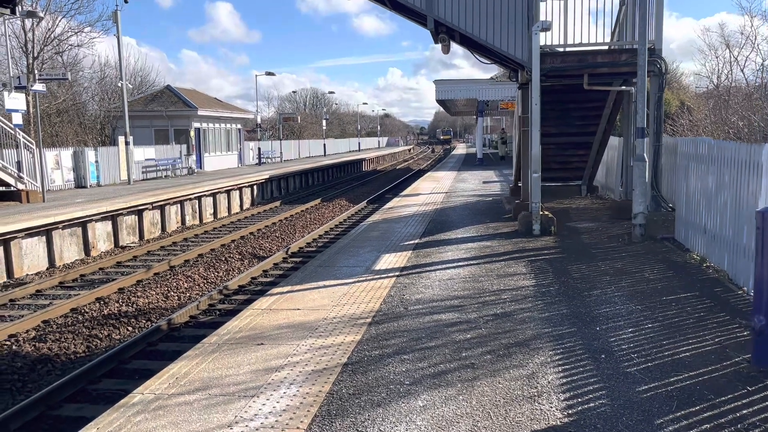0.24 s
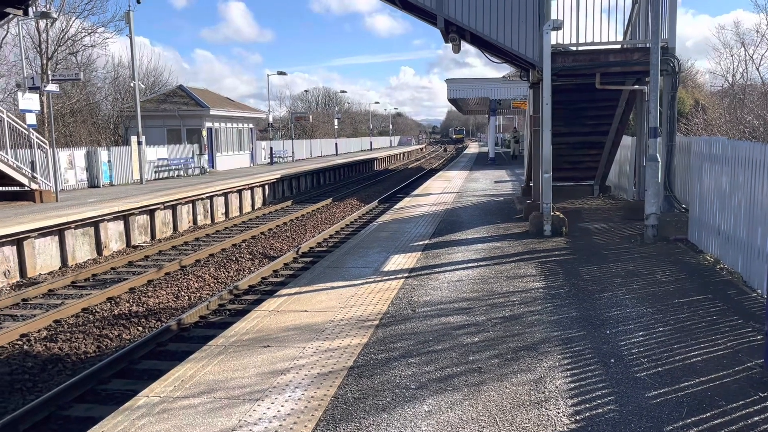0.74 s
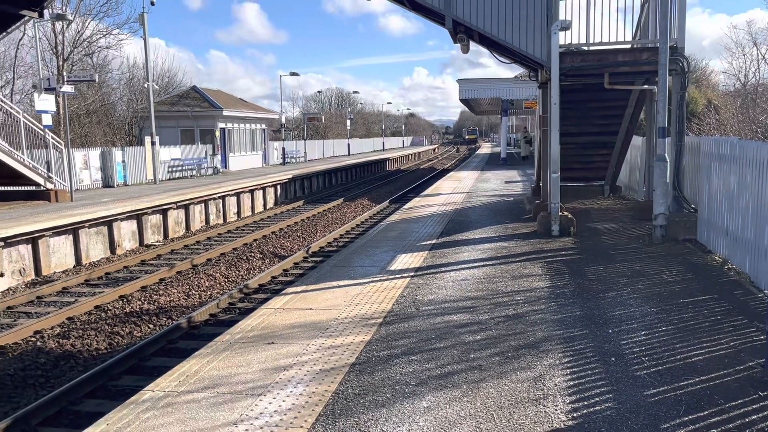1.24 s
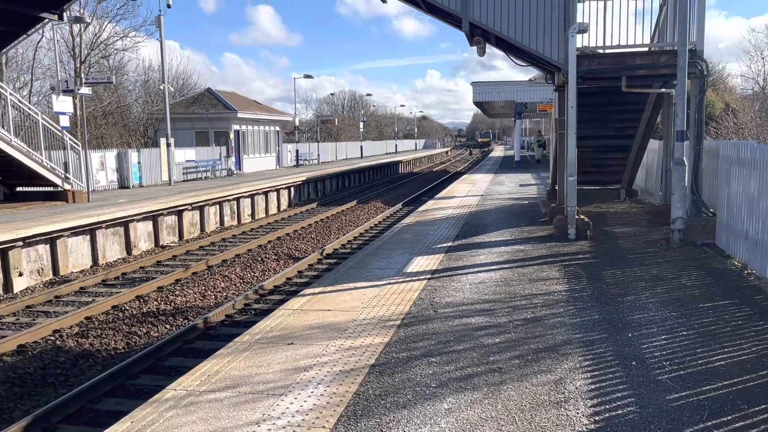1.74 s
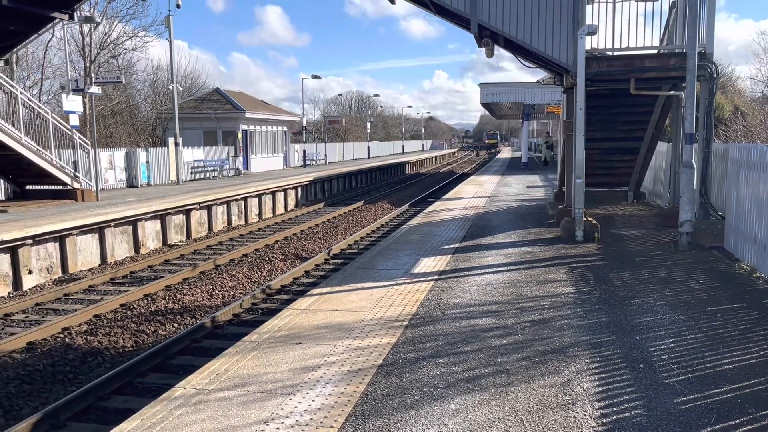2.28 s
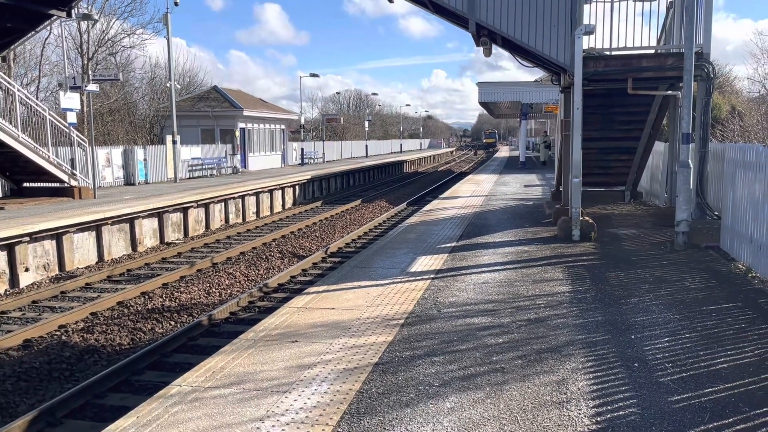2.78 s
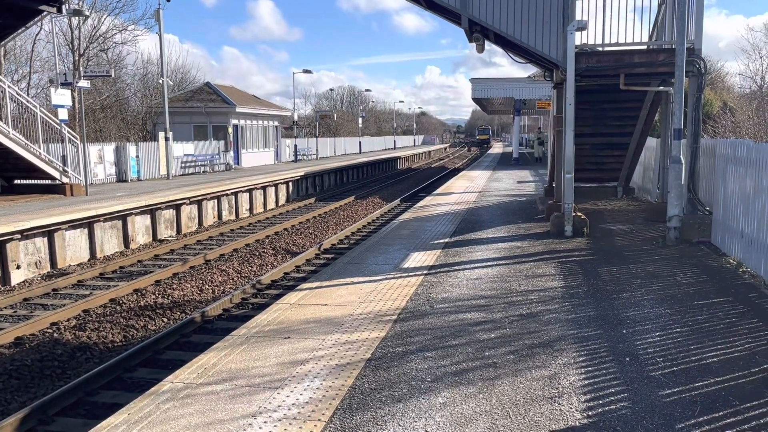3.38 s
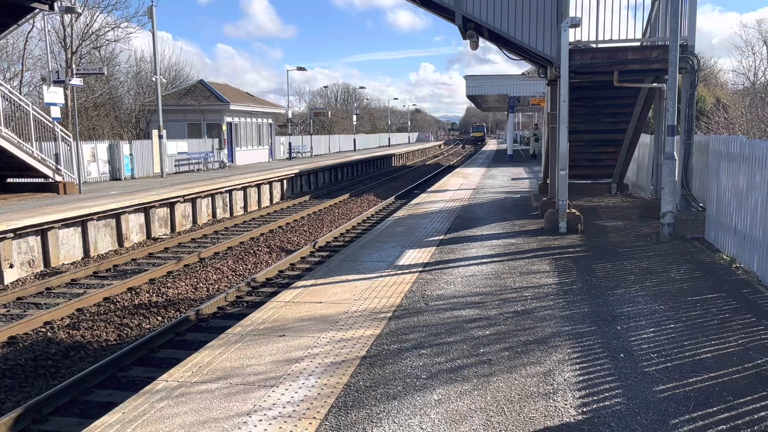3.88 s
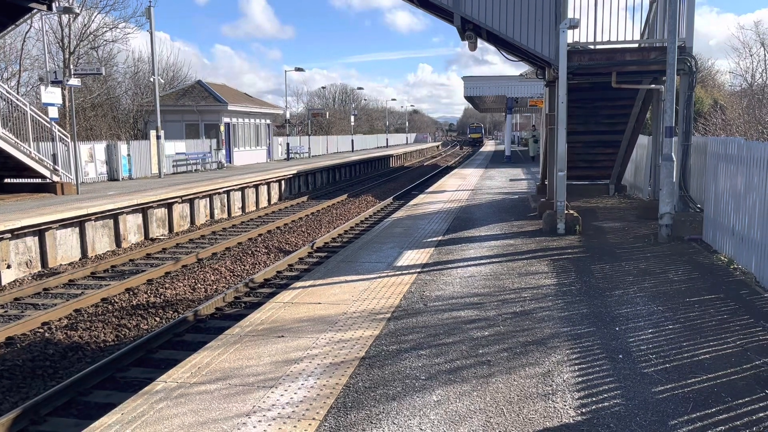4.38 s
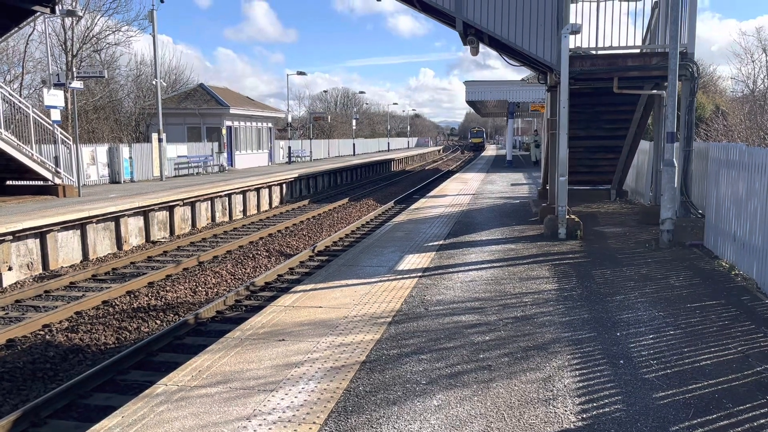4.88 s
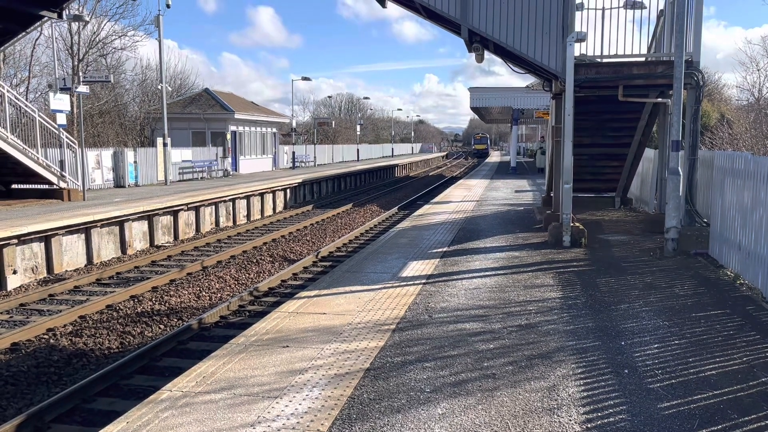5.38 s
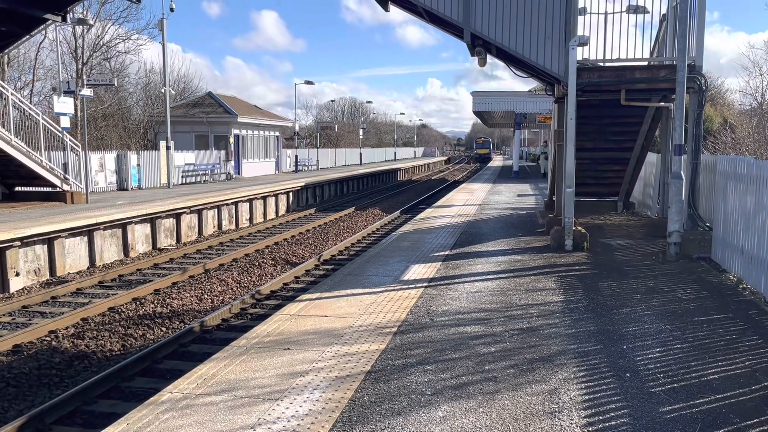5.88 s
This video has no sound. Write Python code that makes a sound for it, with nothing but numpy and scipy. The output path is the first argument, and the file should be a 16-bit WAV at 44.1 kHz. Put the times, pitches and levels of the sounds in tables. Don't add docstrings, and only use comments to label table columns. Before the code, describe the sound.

Deep fluttering wind rumble dominates, surging at about two and four seconds. Behind it a far train's broad, muffled roar and steady low hum swell very gradually without arriving. Thin high bird calls and softer sliding whistles appear throughout from nearby trees. Handling ticks cluster near one and a half and four point three seconds. Open outdoor stereo pickup, handheld.

```python
import sys
import numpy as np
from scipy import signal
from scipy.fft import rfft, irfft, next_fast_len
from scipy.io import wavfile

SR = 44100
rng = np.random.default_rng(int(sys.argv[2]) if len(sys.argv) > 2 else 0)


def convert_level_to_amplitude(level_db):
    exponent = np.asarray(level_db, float) / 20
    return 10 ** exponent


def bounce(signal):
    frames = np.transpose(np.atleast_2d(signal))
    limited = np.clip(frames, -1, 1)
    pcm = np.round(limited * 32767).astype(np.int16)
    wavfile.write(sys.argv[1], SR, pcm)


N = 270333


def rms_one(x):
    return x / np.sqrt(np.mean(x ** 2) + 1e-20)


def at_hz(points, hz, axis=1):
    points = np.array(points)
    return np.interp(np.log(hz), np.log(points[:, 0]), points[:, axis])


def drift(rate_hz):
    pole = np.exp(-2 * np.pi * rate_hz / SR)
    wander = signal.lfilter([1], [1, -2 * pole, pole * pole], rng.standard_normal(N + SR))
    return rms_one(wander[SR:])


# frequency in Hz, likeness of the two sides from 0 to 1, phase lead of
# the left in radians, left over right level in dB.
SIDES = [(60, .98, 0, 0), (320, .84, -.6, .6), (470, .2, -1.3, 1.8), (620, .45, -2.4, -1.4),
         (850, .5, -3.3, -1.2), (1150, .35, -3, -3), (1300, .25, -2, -7), (1600, .5, -1.4, -5.5),
         (1720, .6, .6, 3.8), (2200, .65, .8, 0), (3800, .52, 1.3, 3), (5300, .4, 2.6, 1.5),
         (8000, .7, 3.14, -2), (10500, .9, 6.28, 0)]


def field(spectrum):
    size = next_fast_len(N)
    hz = np.maximum(np.arange(size // 2 + 1) * SR / size, 1)
    shared, left, right = rfft(rng.standard_normal((3, size)))
    alike = at_hz(SIDES, hz)
    common, own = np.sqrt(alike), np.sqrt(1 - alike)
    half = convert_level_to_amplitude(at_hz(SIDES, hz, axis=3) / 2) * np.exp(.5j * at_hz(SIDES, hz, axis=2))
    ports = np.array([half * common * shared + abs(half) * own * left,
                      common * shared / half + own * right / abs(half)])
    inside = (hz > spectrum[0][0]) & (hz < spectrum[-1][0])
    out = irfft(ports * convert_level_to_amplitude(at_hz(spectrum, hz)) * inside, size)[:, :N]
    return out / np.std(out.mean(axis=0))


def pan(x, side_db, lag=0):
    return np.array([np.roll(x, lag) * convert_level_to_amplitude(side_db / 2), x * convert_level_to_amplitude(-side_db / 2)])


def echoes(x, t60, wet_db):
    t = np.arange(SR // 2) / SR
    tail = rng.standard_normal((2, len(t))) * convert_level_to_amplitude(-60 * t / t60) * (t > .004)
    response = rms_one(tail) / np.sqrt(len(t))
    return convert_level_to_amplitude(wet_db) * signal.fftconvolve(x[None], response, axes=1)[:, :N]


# start in seconds, level in dB.
GUSTS = [
    (-.05, -43.5),
    (2.1, -38.5),
    (3.8, -36.5),
]


def gust_db():
    t = np.arange(N) / SR
    rise_s, sag_db_per_s = 0.048, 3
    levels = []
    for s, db in GUSTS:
        before_full = np.clip((s + rise_s - t) / rise_s, 0, 1)
        levels.append(db - sag_db_per_s * (t - s) - 40 * before_full)
    return np.max(levels, axis=0)


# time in seconds, peak in dB, frequency in Hz, width in seconds.
SURGES = [(0.035, -34, 66, 0.022), (0.48, -34.5, 65, 0.032), (0.668, -29, 74, 0.016),
          (0.728, -39.5, 65.1, 0.02), (0.931, -37.5, 73, 0.04), (1.059, -33, 67.5, 0.027),
          (1.209, -38.5, 72.5, 0.086), (1.448, -34.5, 69.0, 0.04), (1.694, -35, 75.4, 0.037),
          (1.952, -33.5, 70.7, 0.028), (2.192, -24.5, 71.2, 0.036), (2.309, -33, 64.7, 0.018),
          (2.5, -28, 79.6, 0.023), (2.783, -33, 71.4, 0.02), (3.107, -29, 64.6, 0.024),
          (3.402, -32, 66.0, 0.027), (3.529, -34.5, 75.4, 0.014), (3.93, -25.5, 68, 0.053),
          (3.997, -26.5, 68.6, 0.012), (4.049, -25, 65.9, 0.011), (4.213, -28.5, 67.6, 0.033),
          (4.34, -32.5, 78, 0.014), (4.755, -34.5, 75.3, 0.03), (4.875, -32.5, 70.5, 0.017),
          (5.025, -32.5, 65.8, 0.018), (5.112, -35.5, 80, 0.062), (5.457, -32, 75, 0.039),
          (5.635, -39, 59.0, 0.019), (5.76, -31.5, 71.9, 0.028), (6.059, -36.5, 62.3, 0.018)]


def ripples():
    gap_s = .11
    s = np.arange(.1, N / SR, gap_s)
    chance = rng.standard_normal((200, 4))[:len(s)]
    s = np.clip(s + .2 * gap_s * chance[:, 0], 0, N / SR)
    peak_db = -41.5 + 1.5 * chance[:, 1]
    hz = 74.4 + 4.4 * chance[:, 2]
    width_s = .021 * np.exp(0.2 * chance[:, 3])
    rows = np.transpose([s, peak_db, hz, width_s])
    return [tuple(row) for row in rows
            if min(abs(row[0] - at) - width for at, _, _, width in SURGES) > .025]


# frequency in Hz, density in dB per Hz.
RUMBLE_COLOUR = [(12, -46.5), (20, -15.5), (46, -4.5), (65, -3.5), (83, -2.5), (114, -15), (170, -17.5),
                 (220, -50), (370, -120)]


def rumble():
    stretch, bed_db, apart_db, buffet_db = 1.27, -2.0, -19, -13
    t = np.arange(-8000, 8000) / SR
    heave = np.zeros((3, N + SR))
    phases = rng.uniform(0, 2 * np.pi, (200, 2))
    for (s, db, hz, width), phase in zip([*SURGES, *ripples()], phases):
        swell = convert_level_to_amplitude(db - 1.57) * np.exp(-2 * np.log(2) * (t / (stretch * width)) ** 2)
        at = int(s * SR)
        heave[:2, at:at + len(t)] += swell * np.sin(2 * np.pi * hz * t + phase[:, None])
        heave[2, at:at + len(t)] += swell
    both, apart, gust = heave[:, 8000:N + 8000]
    bed = convert_level_to_amplitude(gust_db() + bed_db) + convert_level_to_amplitude(buffet_db) * gust
    return both + convert_level_to_amplitude(apart_db) * apart * [[1], [-1]] + bed * field(RUMBLE_COLOUR)


def sung(shape, notes):
    return [[(s + share * length, hz + bend_hz, db + under_db) for share, bend_hz, under_db in shape]
            for s, length, hz, db in notes]


def whistle(notes, flutter_db, waver, octave_db=-45):
    out, t = np.zeros(N), np.arange(N) / SR
    flutter = convert_level_to_amplitude(flutter_db * drift(37))
    shake = 1 + waver * drift(65)
    for rows in notes:
        span = slice(int(rows[0][0] * SR), int(rows[-1][0] * SR))
        s, row_hz, row_db = np.transpose(rows)
        hz = np.interp(t[span], s, row_hz)
        level_db = np.interp(t[span], s, row_db)
        turn = 2 * np.pi * np.cumsum(hz * shake[span]) / SR
        tone = np.sin(turn) + convert_level_to_amplitude(octave_db) * np.sin(2 * turn)
        ends = signal.windows.tukey(len(hz), .15)
        out[span] += np.sqrt(2) * convert_level_to_amplitude(level_db) * ends * flutter[span] * tone
    return out


# start in seconds, length in seconds, pitch in Hz, level in dB.
RISING = [
    (0.288, .24, 3815, -75.5),
    (1.782, 0.23, 4040, -71.5),
    (3.765, .29, 3966, -72.5),
    (5.421, .27, 4010, -71.5),
]
LOW_NOTES = [
    (0.769, 0.081, 2920, -77.5),
    (2.08, .125, 2960, -73),
    (4.06, .14, 2900, -73),
    (5.72, .2, 2870, -81),
]
# share of the length, offset from the pitch in Hz, offset from the level in dB.
RISE_SHAPE = [(0, -450, -9), (.12, -200, -3), (.4, 0, 0), (.7, 120, -3), (1, 200, -8)]
LOW_SHAPE = [(0, -190, -6), (.65, 0, 0), (1, 50, -9)]
# start in seconds, length in seconds, start pitch in Hz,
# end pitch in Hz, level in dB.
SHORT_NOTES = [(0.581, 0.073, 4980, 4750, -74.5), (.655, .055, 4200, 3920, -79),
               (2.9, 0.053, 4950, 4870, -74), (3.012, .03, 4850, 4780, -73), (4.189, .07, 4450, 4350, -73),
               (4.72, .13, 4880, 4590, -77.5), (5.094, 0.089, 5140, 5000, -81),
               (5.716, 0.1, 4560, 4390, -75.5)]


def far_song():
    short = []
    for s, length, start_hz, end_hz, db in SHORT_NOTES:
        short.append([(s, start_hz - 180, db - 7), (s + .3 * length, start_hz, db),
                      (s + length, end_hz, db - 7)])
    return whistle(sung(RISE_SHAPE, RISING) + sung(LOW_SHAPE, LOW_NOTES) + short, 5.0, waver=.011)


# start in seconds, length in seconds, lower voice in Hz,
# lower voice level in dB, upper voice level in dB.
CALLS_TWO = [
    (.915, 0.14, 5730, -62.5, -63.5),
    (1.862, 0.14, 5710, -65.5, -74.5),
    (3.134, .16, 5770, -66, -69.5),
    (3.385, .17, 5800, -68.5, -70),
    (5.263, .145, 5750, -61.5, -71),
]
# share of the length, offset from the pitch in Hz,
# offset from the level in dB.
LOWER_SHAPE = [(0, 150, -3), (.12, 40, 0), (.6, 0, 0), (.75, -130, -3), (1, -290, -6)]
UPPER_SHAPE = [(0, -170, -2), (.3, 20, 0), (.6, 40, -2), (1, -60, -9)]


def near_call():
    below = [call[:4] for call in CALLS_TWO]
    above = [(s + .008, .85 * length, 6050, db) for s, length, _, _, db in CALLS_TWO]
    lower = whistle(sung(LOWER_SHAPE, below), 3.0, waver=.006, octave_db=-40)
    upper = whistle(sung(UPPER_SHAPE, above), 4.5, waver=.009, octave_db=-29)
    return lower + upper


# time in seconds, peak in dB.
CHIPS = [
    (2.122, -75),
    (2.307, -77),
    (4.859, -76),
    (4.97, -75),
    (5.063, -77),
]


def chips():
    start_hz, top_hz, length_s = 5800, 7500, .009
    u = np.arange(int(length_s * SR)) / (length_s * SR)
    hz = start_hz + (top_hz - start_hz) * u ** 0.7
    glide = np.sin(2 * np.pi * np.cumsum(hz) / SR) * np.sin(np.pi * u) ** 0.31
    at = np.zeros(N)
    for s, db in CHIPS:
        at[int(s * SR)] = convert_level_to_amplitude(db + 3.5)
    return signal.fftconvolve(at, glide)[:N]


def birds():
    far, near, quick = far_song(), near_call(), chips()
    return (pan(far, 2.5, lag=-2) + echoes(far, 0.3, -1.5)
            + pan(near, -2.5, lag=3) + echoes(near, 0.42, -7)
            + pan(quick, 1.2) + echoes(quick, 0.23, 0.5))


# time in seconds, peak in dB,
# frequency in Hz, left over right level in dB.
TICKS = [(0.858, -64, 5090, -8), (0.9632, -57, 5640, -7), (1.1667, -68, 4900, 3), (1.3222, -58, 5540, -8),
         (1.469, -66.5, 5300, -1), (1.472, -57.5, 5800, -12), (1.4848, -59, 4870, -2),
         (1.4883, -48.5, 4370, 18), (1.4993, -49, 3780, 0), (1.5764, -52.5, 3370, 1),
         (1.6218, -62, 3300, 3), (1.6753, -60.5, 4700, 5), (2.2413, -62, 4240, 5), (2.25, -57, 4186, 7),
         (4.2738, -65, 6640, 8), (4.2789, -50, 5100, -7), (4.2818, -54, 4670, 21), (4.285, -44.5, 4030, -1),
         (4.3093, -56, 4430, 0), (4.341, -51, 3330, 5), (4.3505, -50.5, 3440, -1), (4.3985, -59, 4310, -1),
         (4.407, -48, 4000, 4), (4.439, -55.5, 3580, -1.5), (4.4612, -59.5, 5000, -6),
         (5.2408, -66, 5300, 4), (5.9383, -53.5, 3480, -6), (5.996, -54, 3680, 9), (6.077, -54.5, 3560, 8)]
SNAPS = [(.867, -72, 10700, -9), (.963, -65, 12100, -2), (1.471, -66.5, 12300, -2.5),
         (1.4727, -52.5, 10500, -5), (1.4855, -69.5, 12560, -7), (1.499, -62, 10460, 3),
         (1.5346, -71, 9760, -5), (4.2735, -53, 9470, 7), (4.278, -58.5, 9800, -4),
         (4.3412, -74, 10100, 10), (5.242, -78, 11100, -6)]
# time in seconds, peak in dB,
# left over right level in dB.
KNOCKS = [(1.8427, -60, 0), (3.1291, -53, 5), (3.2223, -48.5, 0), (3.4482, -45.5, 5), (3.4507, -45.5, -3),
          (4.347, -52, -2), (4.3852, -55, 0), (5.748, -66, -3), (5.94, -52, -5)]
PRICKS = [(.6543, -71, 3), (1.4172, -74, -6), (1.501, -62, 2), (2.0456, -79, 7), (2.278, -76, -3),
          (3.1285, -77, -8), (4.408, -67, 3), (5.5724, -68, -9.5)]


def contacts():
    chance = rng.standard_normal(40)
    knocks = [(s, db, 1960 + 110 * c, side_db) for (s, db, side_db), c in zip(KNOCKS, chance)]
    pricks = [(s, db, 6800, side_db) for s, db, side_db in PRICKS]
    return [*TICKS, *SNAPS, *knocks, *pricks]


def ticks():
    cycles, sag, rise_cycles = 12, 0.18, 0.99
    out, t = np.zeros((2, N + SR)), np.arange(900) / SR
    for s, db, hz, side_db in contacts():
        turns = t * hz
        sagging_hz = hz * (1 - sag / 3 + sag * np.exp(-turns / 2.0))
        turn = 2 * np.pi * np.cumsum(sagging_hz) / SR
        swell = convert_level_to_amplitude(-60 * turns / cycles) * (1 - np.exp(-turns / rise_cycles)) ** 2
        tick = convert_level_to_amplitude(db + 2.0) * swell / swell.max() * np.sin(turn)
        at = int((s - 1.6 / hz) * SR)
        out[:, at:at + len(t)] += pan(tick, side_db, lag=-1)
    out = out[:, :N]
    return out + echoes(out.mean(axis=0), 0.033, -3.5)


def hum():
    turn = 2 * np.pi * np.cumsum(291 + 0.54 * drift(2.43)) / SR
    order = np.sin(turn) * convert_level_to_amplitude(3.1 * drift(3))
    octave = convert_level_to_amplitude(-16) * np.sin(2 * turn) * convert_level_to_amplitude(2.6 * drift(2.3))
    return pan(np.sqrt(2) * convert_level_to_amplitude(-54.5) * (order + octave), 0.3, lag=16)


# frequency in Hz, density in dB per Hz.
BODY = [(53, -27.5), (90, -4.5), (113, -6.5), (231, -8), (296, -9), (326, -6), (356, -16), (450, -16.5),
        (580, -49), (990, -120)]
ROLLING = [(210, -30.5), (350, -2), (455, -4), (495, 0), (543, -5.5), (587, -1.5), (920, -4), (1200, -8),
           (1520, -10), (1620, -13), (1680, -23.5), (1900, -46.5)]
HISS = [(1400, -33), (1650, -6.5), (1750, -1.5), (2150, -3), (2520, -7), (3700, -13.5), (4200, -13.5),
        (4900, -13.5), (5800, -19), (6800, -27), (7800, -31), (9000, -64)]
AIR = [(4120, -29), (7000, 1), (8180, -13), (8760, -11), (9680, -2), (10400, -8), (12600, -8), (14200, -18)]


def roar():
    t, stir = np.arange(N) / SR, drift(3.7)
    body = convert_level_to_amplitude(-47.5 + 0.2359 * t + 0.24 * drift(13)) * field(BODY)
    rolling = convert_level_to_amplitude(-54 + 0.535 * t + .6 * stir) * field(ROLLING)
    hiss = convert_level_to_amplitude(-68.5 + 0.26 * t + 0.5 * stir + .7 * drift(15)) * field(HISS)
    return body + rolling + hiss + convert_level_to_amplitude(-97) * field(AIR)


def scene():
    return rumble() + birds() + ticks() + hum() + roar()


def roll_off(x):
    return signal.sosfilt(signal.butter(12, 14320, fs=SR, output="sos"), x)


def record(dry):
    deep_cut = signal.butter(4, 36, "high", fs=SR, output="sos")
    mix = signal.sosfilt(deep_cut, dry)
    return roll_off(mix)


dry = scene()
out = record(dry)
bounce(out)
```